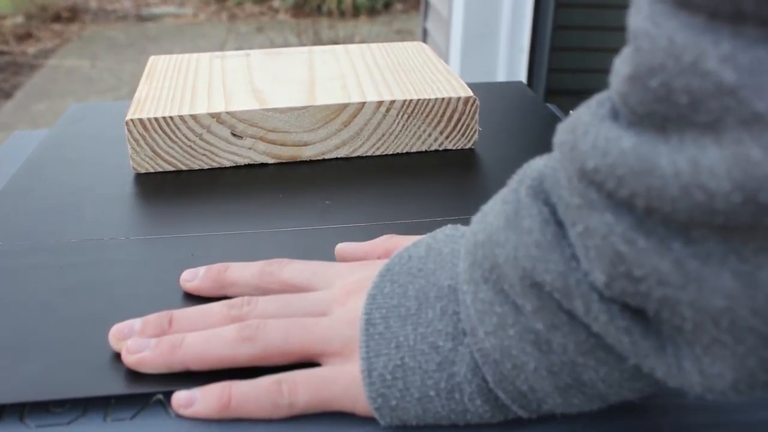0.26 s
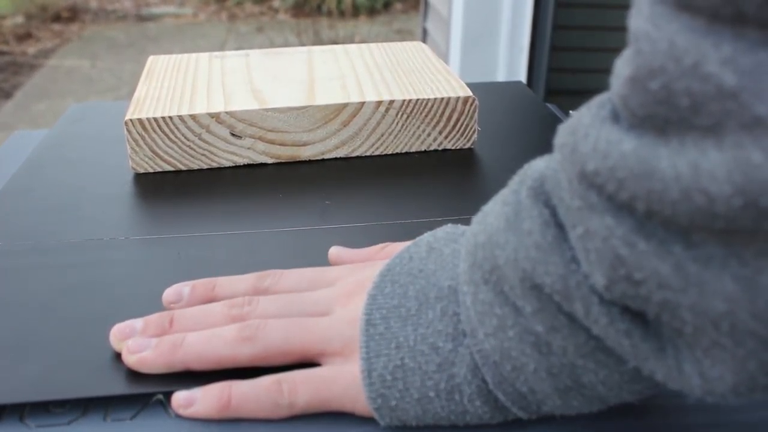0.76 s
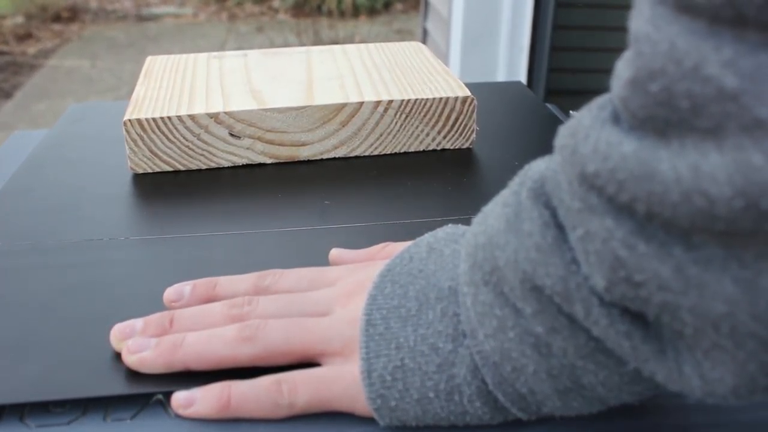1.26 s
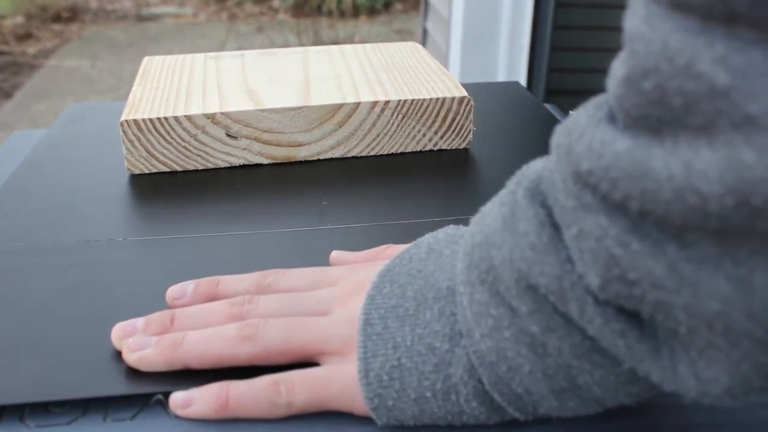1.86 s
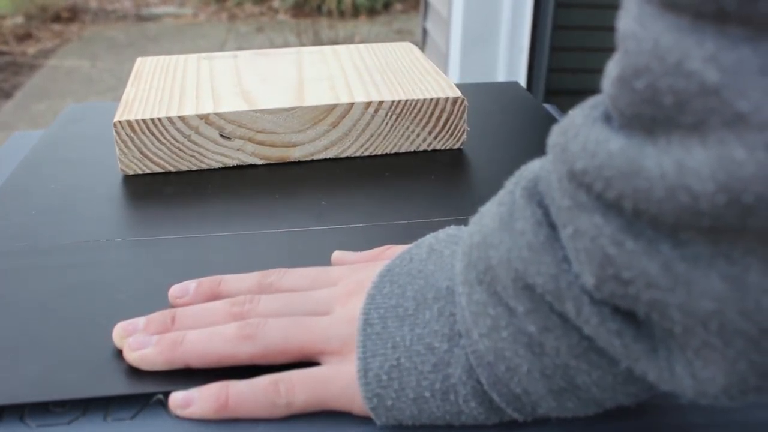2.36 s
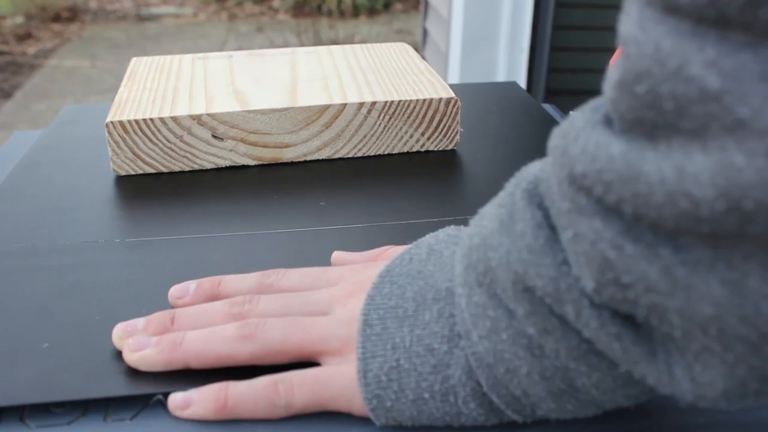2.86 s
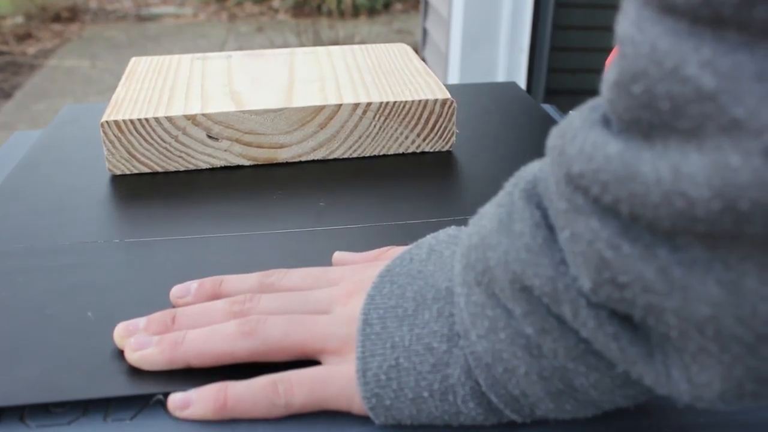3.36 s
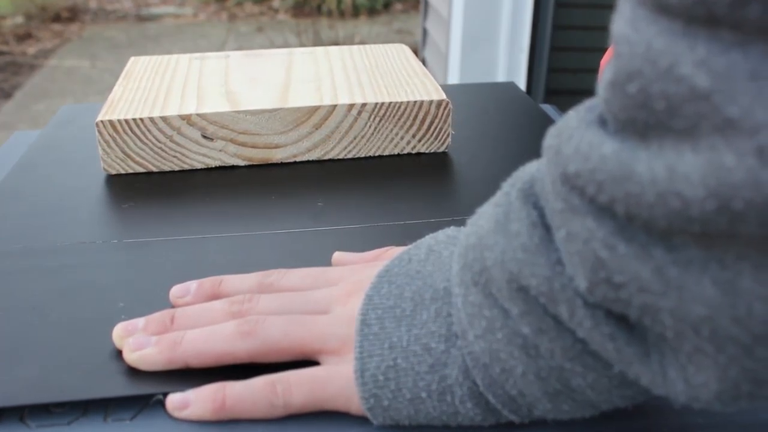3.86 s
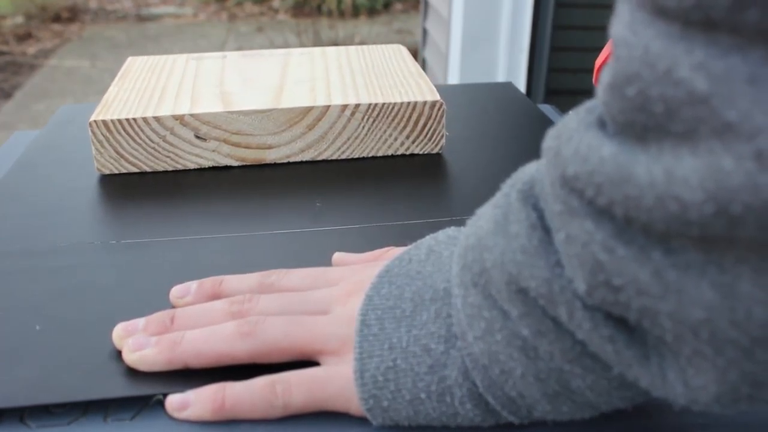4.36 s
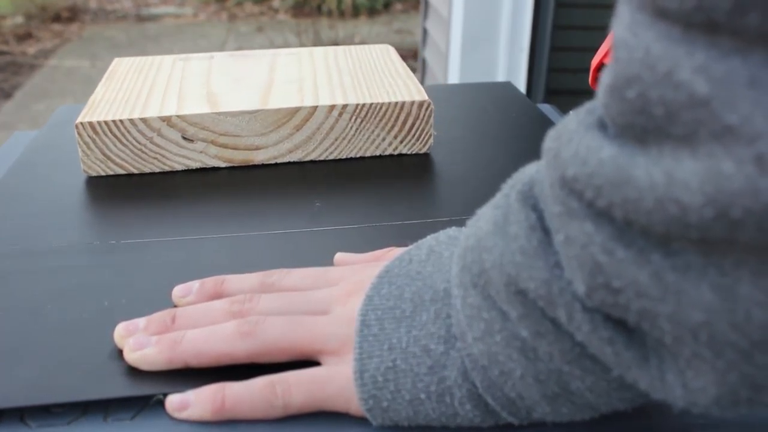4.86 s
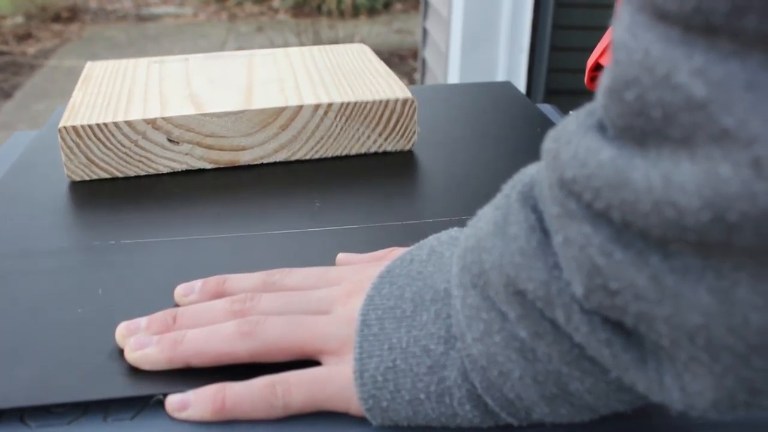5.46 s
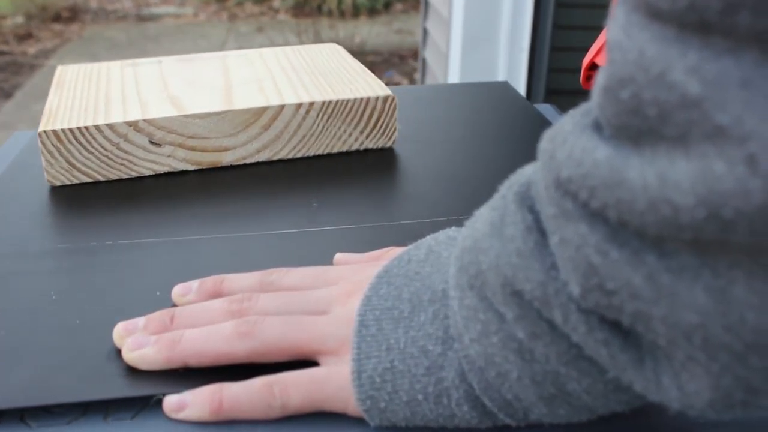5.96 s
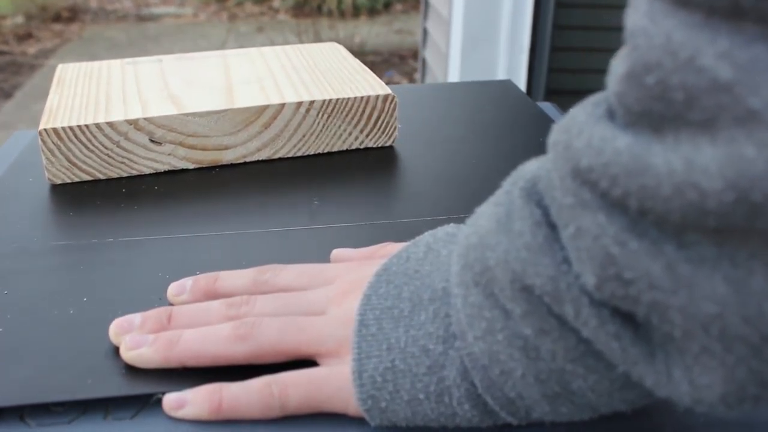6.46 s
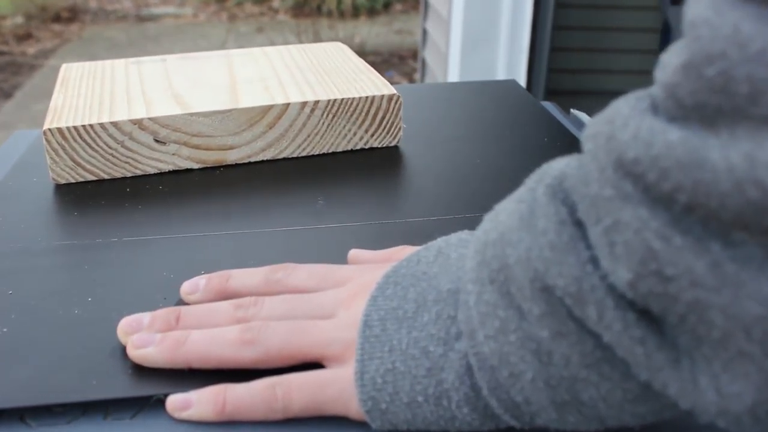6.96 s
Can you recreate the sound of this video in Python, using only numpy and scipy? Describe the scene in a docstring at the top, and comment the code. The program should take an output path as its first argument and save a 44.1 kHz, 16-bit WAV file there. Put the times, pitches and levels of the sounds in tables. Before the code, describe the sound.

A close, dry mono sound of an electric jigsaw cutting sheet metal outdoors. At 0 s the saw is already turning slowly, around six strokes per second, with quick scrapes, bumps and snagging teeth at the metal edge. Strokes accelerate through the first second, each rasping and sweeping upward and down in a metallic whine, while the sheet rings brightly. By 1.5-2 s they merge into a harsh, fluttering buzz at about 44 strokes per second, over motor hum and gear rattle. From 2.3 to 3.2 s the sheet patters harder in several brief jumps. The sheet ringing and whine fade, and from about 4 s a pinched squeal and bright rasp dominate. Pressure eases near 5.9 s; cutting stops around 6.1 s with a click, scrapes and a knock. The motor's whirr and hum slow and fall in pitch until about 7.2 s, with a few small late bumps and scrapes, still turning at the end.

```python
"""A jigsaw with a fine-toothed blade runs up to speed, outdoors and close by: motor and gears hum and whirr.
Scrapes and bumps come as the blade meets the edge of sheet metal, and each cutting stroke whines and rasps:
passing teeth make a sweeping tone and chips make bursts of noise, and both set sheet and blade ringing.
Deep in the cut the pinched blade squeals more, and the sheet patters harder in a few jumps.
The push eases, the trigger is let go, the blade scrapes out of the cut, and the motor winds down."""
import sys
import numpy as np
from scipy import signal
from scipy.fft import rfft, irfft
from scipy.io import wavfile
from scipy.ndimage import uniform_filter1d, minimum_filter1d

SR = 44100
rng = np.random.default_rng(int(sys.argv[2]) if len(sys.argv) > 2 else 0)


def inscribe(sig):
    """Save sig as 16-bit PCM at rate SR to the path in sys.argv[1].

    A 1-D sig is mono; a 2-D sig holds one channel per row.
    Samples are clipped to [-1, 1] before scaling.
    """
    pcm = np.round(np.clip(np.atleast_2d(sig).T, -1, 1) * 32767)
    wavfile.write(sys.argv[1], SR, pcm.astype(np.int16))


N = 317640

# run-up of the crank as the trigger is squeezed: t/s, speed/strokes per s
RUN_UP = [(0.0, 6.29), (0.15, 7.47), (0.21, 12.2), (0.39, 16.6), (0.69, 20.53), (0.8, 21.75), (0.93, 24.82),
          (1.17, 27.99), (1.35, 36.87), (1.57, 41.45), (2.01, 43.79), (2.83, 43.96), (3.29, 43.78)]
# whirr of motor and gearbox: t/s, level/dB
WHIRR = [(0, -25.5), (1.2, -32), (1.8, -24), (5.9, -20.5), (6.13, -26.5), (6.7, -26), (7.2, -23.5)]
# spectrum of the gear rattle: f/Hz, level/dB
GEARS = [(60, -28), (180, -19), (300, -11.5), (650, -3), (900, -10.5), (1300, -4.5), (1900, -2), (3500, -4),
         (5200, -3.5), (6400, -12), (8000, -12.5), (10000, -14.5), (14000, -16.5), (15800, -28)]
# resonances of the gearbox housing: f/Hz, width/Hz, level/dB
HOUSING = [(472, 285, -5.5), (1630, 114, -1), (1836, 65, 1.5), (2083, 77, 3.5), (2645, 170, -2.5),
           (3400, 100, -1), (7300, 400, -10.5)]
# crank shake: multiple of the stroke rate, level at the edge/dB, level at the end of the cut/dB
SHAKE = [(2, -62, -49.5), (3, -38.5, -64.5), (4, -55, -51.5), (5, -59, -48.5), (6, -57, -47), (7, -57, -50),
         (11, -39.5, -54), (27, -42, -38)]
# blade and shoe scraping the edge: t/s, length/s, level/dB
SCRAPES = [(0.035, 0.0044, -14.5), (0.058, 0.011, -17), (6.161, .04, -41), (6.219, 0.01, -24.5),
           (6.252, 0.01, -25), (6.275, 0.0032, -20.5), (6.297, 0.014, -19.5), (6.88, 0.02, -24),
           (7.156, 0.0058, -25)]
# knocks and dull bumps of the saw and the sheet: t/s, f/Hz, level/dB, length/s
BUMPS = [(0.038, 117, -40, 0.012), (0.045, 284, -39, 0.02), (1.07, 140, -53, 0.046),
         (6.103, 1500, -24, 0.0048), (6.3, 249, -32.5, 0.0067), (6.634, 110, -52, .022),
         (6.775, 190, -35, 0.006), (7.159, 110, -48, .022)]
# how hard the saw is fed, before the gentle entry, snags and easing: t/s, level/dB
FEED = [(0.45, -29), (0.49, -28), (0.94, -22), (1.38, -26), (2.35, -22), (4.81, -18.5), (5.92, -20),
        (5.95, -15.5)]
# the teeth snag: t/s, length/s, extra sheet ringing level/dB, extra bite level/dB
SNAGS = [(0.027, 0.004, 5, 10), (0.054, 0.0068, 1, 1), (0.104, 0.0022, 5, 12), (0.124, 0.0036, 13, 7),
         (0.225, 0.0085, 0, 9.5), (0.298, 0.011, 2.5, 7.5), (0.373, 0.0077, 5, 12), (6.054, 0.0047, 3, 3)]
# resonances that the tooth tone sweeps through: f/Hz, width/Hz, level/dB
WHINE = [(2040, 57, 2.5), (2730, 58, 5.5), (3490, 150, -7.5), (3776, 104, 2.5), (4127, 88, 7.5),
         (5580, 760, 7)]
# resonances of the sheet: f/Hz, width/Hz, level/dB
SHEET = [(959, 49, -8), (1179, 18, -6), (1253, 45, -6.5), (1393, 48, -1), (1543, 44, -2), (2184, 120, 0),
         (2630, 56, -30)]
# resonances of blade and guide: f/Hz, width/Hz, level/dB
BLADE = [(2320, 300, -20.5), (2542, 73, -6), (3130, 610, -6.5), (3660, 400, 0), (3804, 260, 2),
         (4200, 180, -4.5), (4640, 510, -9)]
# resonances of the pinched blade: f/Hz, width/Hz, level/dB
SQUEAL = [(2350, 390, -8), (2810, 102, -2), (3072, 84, -0.5), (3395, 78, 3.5)]
# spectrum of the rasp: f/Hz, level/dB
RASP = [(50, -43), (120, -29), (280, -12.5), (600, -15), (900, -7.5), (2000, -7), (4000, -1), (5500, -2.5),
        (7300, 0.5), (9500, -2), (12500, -4), (15500, -11.5)]
# ring of the guide roller towards the end of the cutting stroke: f/Hz, width/Hz, level/dB
ROLLER = [(6240, 530, 13.5), (8100, 410, -5), (10100, 530, -13)]
# resonances of the support under the sheet: f/Hz, width/Hz, level/dB
SUPPORT = [(120, 12, -9), (271.6, 24.5, -1.5), (323, 31, -5), (344, 11, -1.5), (488, 46, -2.5),
           (713, 40, -0.5), (1073, 18, 2.5)]
# the sheet jumps on its support: t/s, extra patter level/dB
JUMPS = [(0.04, 15.5), (0.22, 15), (2.3, 5.5), (2.42, 8.5), (2.548, 7), (2.77, 10), (3.01, 8), (3.218, 8)]

TIME = np.arange(N) / SR
CUT_ENDS_S = 6.115
DEPTH = np.minimum(TIME / CUT_ENDS_S, 1)   # share of the cutting time that has passed
# rotor turns per crank turn; crank position at the start (turns)
GEAR_RATIO, START_TURN = 9.2, .18
# the trigger is let go; time for the speed to fall to about a third
RELEASE_S, COAST_S = 5.96, 1.32
EASE_OFF_S, EASE_OFF_DB_PER_S = 5.893, 98   # the hand stops pushing
# free rotor at full speed; loss as it slows; gain as the shoe moves onto the sheet
HUM_DB, HUM_SPEED_POWER, HUM_DEPTH_DB = -36.5, 2.17, 9
SEATED_S, SEATING_S = 1.12, 0.15   # the shoe settles on the sheet and passes on the rotor's hum
SHAKE_SPEED_POWER = 10.6
# the teeth only skim the edge at first: less sheet ringing, fewer chips
ENTRY_DB, ENTRY_FEED_DB, ENTRY_S = -10, -11.5, 0.33
# the sheet rings more while the blade is near its free edge
SHEET_DB, FREE_EDGE_DB, FREE_EDGE_S = -28.5, 20.5, 1.69
WHINE_DB, WHINE_FADE_DB = -13.5, -15   # tooth tone at the edge; change over the whole cut
WHINE_LEAK = .15   # share of the tooth tone heard past the resonances
TEETH_PER_HALF_STROKE, OVERSHOOT = 13.15, .105   # swing of the blade; extra share of it at full speed
RETURN_DB, RETURN_FADE_DB = -1, -24.5   # rub of the return stroke at the edge; change over the whole cut
# pressure on the teeth: middle and widths of the two strokes (turns), and the share left between them
BITE_AT, BITE_WIDTH, RUB_WIDTH, SLACK = -.03, .115, .16, .05
RASP_DB = 2.5   # relative to the feed
BLADE_DB, BLADE_FOLLOWS = 0.5, 0.83   # blade ringing; share of the feed's swing
PINCH_S, PINCH_SPREAD_S = 5.4, 0.99   # the slot closes on the blade around this time
SQUEAL_PER_TURN = 77.8   # slips per crank turn at the start of the cut
RING_SAG = .065   # share by which the blade's resonances sink over the whole cut
BUZZ_DB, JUMP_S = -18, 0.048   # patter relative to the feed; length of a jump
CUTOFF_HZ = 15750


def from_db(db):
    """Turns decibels into a gain."""
    return 10 ** (np.asarray(db) / 20)


def rms_one(x):
    """Sets the average strength to 1."""
    return x / np.sqrt(np.mean(x ** 2) + 1e-20)


def even(x, size=6000):
    """Evens out the strength over size samples, twice smoothed; quicker pulsing stays."""
    power = uniform_filter1d(uniform_filter1d(x * x, size), size)
    return x / np.sqrt(np.abs(power) + 1e-12)


def in_time(rows):
    """One curve per column, joined by straight lines."""
    s, *columns = np.transpose(rows)
    return [np.interp(TIME, s, c) for c in columns]


def swell(s, length):
    """A smooth bump in time."""
    return np.exp(-.5 * ((TIME - s) / length) ** 2)


def lobe(turn, centre, width):
    """A smooth bump once per crank turn."""
    return np.exp((np.cos(2 * np.pi * (turn - centre)) - 1) / (2 * np.pi * width) ** 2)


def drift(rate):
    """Smooth chance that varies up to about `rate` Hz; spread 1."""
    smoother = signal.butter(2, rate, fs=SR, output="sos")
    return rms_one(signal.sosfilt(smoother, rng.standard_normal(N + SR))[SR:])


def per_stroke(turn, size=400):
    """A fresh random value for every stroke, changing during the return."""
    return rng.standard_normal(size)[(turn + .4).astype(int) % size]


def grit(turn, repeat, spiky_db, size=1007):
    """Tiny contacts of uneven size; a share of them comes back at the same place in every stroke."""
    share = np.clip(repeat, 0, 1)
    pattern = rng.standard_normal(size)[(turn % 1 * size).astype(int) % size]
    fresh = rms_one(rng.standard_normal(N) * from_db(spiky_db * rng.standard_normal(N)))
    return np.sqrt(share) * pattern + np.sqrt(1 - share) * fresh


def resonate(x, modes):
    """Parallel resonances with alternating signs."""
    out = np.zeros(N)
    for k, (hz, width, db) in enumerate(modes):
        r = np.exp(-np.pi * width / SR)
        top = (1 - r * r) / 2 * np.array([1, 0, -1])
        bottom = [1, -2 * r * np.cos(2 * np.pi * hz / SR), r * r]
        out += (-1) ** k * from_db(db) * signal.lfilter(top, bottom, x)
    return out


def colour(x, spectrum, size=1024):
    """A filter with the given spectrum that acts as promptly as it can (minimum phase)."""
    hz, db = np.transpose(spectrum)
    grid = np.maximum(np.arange(size + 1) * SR / (2 * size), 1)
    cepstrum = irfft(np.log(from_db(np.interp(np.log(grid), np.log(hz), db))))
    response = irfft(np.exp(rfft(2 * cepstrum[:size], 2 * size)))
    return signal.oaconvolve(x, response)[:N]


def band(x, low_hz, high_hz):
    """Keeps the sound between two frequencies."""
    return signal.sosfilt(signal.butter(2, [low_hz, high_hz], "band", fs=SR, output="sos"), x)


def crank_speed():
    """Strokes per second: the run-up, then friction slows the motor once the trigger is let go."""
    return in_time(RUN_UP)[0] * np.exp(-np.maximum(TIME - RELEASE_S, 0) / COAST_S)


def easing_db():
    """The pressure on the blade dies away at the end of the cut."""
    return -EASE_OFF_DB_PER_S * np.maximum(TIME - EASE_OFF_S, 0)


def motor(speed, turn):
    """The rotor hums, the crank shakes the housing, and the gear teeth rattle in the gearbox."""
    rotor, pace = 2 * np.pi * GEAR_RATIO * turn, speed / speed.max()
    hum_db = HUM_DB + HUM_DEPTH_DB * DEPTH * from_db(easing_db()) + 0.77 * drift(4.2)
    # the second harmonic is stronger at low speed
    waves = np.sin(rotor) + 0.2 / pace ** 2.5 * np.sin(2 * rotor) + 0.25 * np.sin(3 * rotor)
    hum = from_db(hum_db) * pace ** HUM_SPEED_POWER * np.sqrt(2) * waves
    seated = 1 / (1 + np.exp((SEATED_S - TIME) / SEATING_S))

    shake = np.zeros(N)
    for k, first_db, last_db in SHAKE:
        level_db = first_db + (last_db - first_db) * DEPTH + 3.5 * drift(10.4)
        shake += from_db(level_db) * np.sqrt(2) * np.sin(2 * np.pi * (round(k) * turn + rng.random()))

    rattle_db = 1.7 * np.sin(rotor) + 1.6 * np.sin(4 * np.pi * turn) + 1.3 * drift(116)
    rattle = from_db(rattle_db) * grit(turn, repeat=0.13, spiky_db=3)
    housing = rms_one(resonate(rattle * grit(turn, repeat=0, spiky_db=4), HOUSING))
    gears = rms_one(rms_one(colour(rattle, GEARS)) + 0.72 * housing)
    return seated * hum + shake * pace ** SHAKE_SPEED_POWER + from_db(in_time(WHIRR)[0]) * gears


def tooth_tone(turn, pace, back):
    """Teeth pass fastest at mid-stroke, so the tone is highest there; at speed strokes grow long and uneven."""
    # at speed the saw bounces, which lengthens the swing
    swing = TEETH_PER_HALF_STROKE * (1 + pace ** 8 * (OVERSHOOT + .02 * drift(25)))
    tooth = 2 * np.pi * (swing * np.sin(2 * np.pi * turn) + .12 * pace ** 1.5 * drift(150))
    # slow strokes bite earlier and hold the tone longer
    centre, hold = -.07 + .06 * pace, .1 - .03 * pace
    uneven = from_db(3.2 * pace * per_stroke(turn) + 1.5 * drift(400))
    return_bite = np.sqrt(back) * (1.25 - .65 * pace) * lobe(turn, centre + .5, hold)
    bite = uneven * (lobe(turn, centre, hold) + return_bite)
    return bite * (np.sin(tooth) + .28 * np.sin(2 * tooth) + .13 * np.sin(3 * tooth))


def rasping(turn, pace, grip, back):
    """Chips tear off in bright bursts, earlier in the stroke at speed; blade flanks and guide roller rub too."""
    lead = 0.083 * pace
    cut_stroke = .7 * lobe(turn + lead, -.05, .045) + lobe(turn + lead, .04, .095)
    return_stroke = back * lobe(turn - lead, .5, .08)
    tearing = grip * (cut_stroke + 1.9 * return_stroke + 0.12)
    chips = tearing * from_db(0.44 * drift(340)) * grit(turn, repeat=0.44, spiky_db=3.5)
    flanks = 0.37 * band(rng.standard_normal(N), 220, 11200)
    roller_rub = lobe(turn - lead, 0.12, 0.13) * rng.standard_normal(N)
    roller = 0.43 * back * resonate(roller_rub, ROLLER)
    return even(colour(chips + flanks + roller, RASP))


def sag():
    """The blade's pitches as a share of those at the start of the cut."""
    return 1 - RING_SAG * DEPTH ** 2


def sagging(x, modes):
    """Resonances that sink as the cut grows longer, by running them on a slowing clock."""
    samples, clock = np.arange(N), np.cumsum(sag())
    return np.interp(clock, samples, resonate(np.interp(samples, clock, x), modes))


def cutting(speed, turn):
    """The blade bites on the way up and rubs on the way down; teeth and chips make sheet and blade ring."""
    entry, easing = np.exp(-TIME / ENTRY_S), easing_db()
    snag_db = sum(db * swell(s, length) for s, length, _, db in SNAGS)
    snag_ring_db = sum(db * swell(s, length) for s, length, db, _ in SNAGS)
    feed_db = in_time(FEED)[0] + ENTRY_FEED_DB * entry + snag_db + easing
    sheet_db = SHEET_DB + FREE_EDGE_DB * np.exp(-TIME / FREE_EDGE_S) + snag_ring_db
    sheet_db = sheet_db + 0.65 * easing + ENTRY_DB * entry
    whine_db = WHINE_DB + WHINE_FADE_DB * DEPTH + snag_db + easing

    pace = speed / speed.max()
    back = from_db(RETURN_DB + RETURN_FADE_DB * DEPTH)
    grip = from_db(0.42 * drift(51))
    rub = back * lobe(turn, BITE_AT + .5, RUB_WIDTH)
    load = grip * (lobe(turn, BITE_AT, BITE_WIDTH) + rub + SLACK)

    tone = tooth_tone(turn, pace, back)
    whine = band(resonate(even(tone), WHINE) + WHINE_LEAK * even(tone), 1950, 6000)
    scuff = (.9 * load + .8 * pace ** 3) * grit(turn, repeat=.08, spiky_db=3)
    sheet = even(band(resonate(tone + scuff, SHEET), 1016, 1950))
    blade = even(band(sagging(load * grit(turn, repeat=0.18, spiky_db=3), BLADE), 1120, 5860))

    # the pinched blade sticks and slips in each stroke, heard most deep in the cut
    pinch = from_db(1.9 * per_stroke(turn)) * lobe(turn, 0.018, 0.1)
    slips = SQUEAL_PER_TURN * sag() * ((turn + .5) % 1 - .5)
    wobble = 0.61 * np.cos(2 * np.pi * (turn - .01)) + 0.27 * drift(255)
    slip = np.sin(2 * np.pi * (slips + wobble))
    scrape = 2.75 * load * grit(turn, repeat=0.71, spiky_db=0.5)
    squeal = even(band(sagging(pinch * slip + scrape, SQUEAL), 2300, 5100))

    pinched = 1 / (1 + np.exp((PINCH_S - TIME) / PINCH_SPREAD_S))
    blend = np.sqrt(1 - pinched) * blade + 1.54 * np.sqrt(pinched) * squeal
    ringing = from_db(BLADE_DB + BLADE_FOLLOWS * feed_db) * blend
    rasp = from_db(RASP_DB + feed_db) * rasping(turn, pace, grip, back)
    engaged = np.clip((CUT_ENDS_S - TIME) / 0.019 + 1, 0, 1)
    return engaged * (from_db(sheet_db) * sheet + from_db(whine_db) * whine + ringing + rasp)


def support(turn):
    """Each stroke lifts the sheet and lets it patter on its support, more so under a hard feed."""
    patter = (lobe(turn, 0.31, 0.1) + 0.34) * grit(turn, repeat=0.27, spiky_db=-1.5)
    jump_db = sum(db * swell(s, JUMP_S) for s, db in JUMPS)
    buzz_db = BUZZ_DB + in_time(FEED)[0] + easing_db() + jump_db
    return from_db(buzz_db) * even(band(resonate(patter, SUPPORT), 110, 950))


def handling():
    """Short scrapes of steel on the cut edge are coloured noise; dull bumps are brief sine waves."""
    steel = [(100, -33), (300, 0.0), (1500, 9.0), (4300, 9.5), (7000, 0.5), (15000, -8.5)]   # f/Hz, level/dB
    rub = rms_one(colour(rng.standard_normal(N), steel))
    out = rub * sum(from_db(db) * swell(s, length) for s, length, db in SCRAPES)
    for s, hz, db, length in BUMPS:
        out += from_db(db) * swell(s, length) * np.sqrt(2) * np.sin(2 * np.pi * hz * (TIME - s))
    return out


def scene():
    """Adds up the sounds of the saw, all driven by one crank."""
    speed = crank_speed()
    turn = START_TURN + np.cumsum(speed) / SR   # whole numbers fall in the middle of a cutting stroke
    saw = motor(speed, turn) + cutting(speed, turn) + support(turn) + handling()
    return saw[None]


def limiter(x, ceiling_db, release_db_per_s, size=40):
    """The gain ducks at once under a peak and then recovers."""
    over_db = np.maximum(20 * np.log10(np.abs(x) + 1e-9) - ceiling_db, 0)
    fall_db = release_db_per_s * TIME
    held_db = np.maximum.accumulate(over_db + fall_db, axis=-1) - fall_db
    return x * from_db(uniform_filter1d(minimum_filter1d(-held_db, size), size))


def record(dry):
    """The microphone drops the deep bass, a limiter holds the peaks, the top is cut."""
    thinned = signal.sosfilt(signal.butter(2, 75, "high", fs=SR, output="sos"), dry)
    held = limiter(thinned, ceiling_db=-3.2, release_db_per_s=400)
    return signal.sosfilt(signal.ellip(12, .1, 90, CUTOFF_HZ, fs=SR, output="sos"), held)


dry = scene()
out = record(dry)
inscribe(out)
```